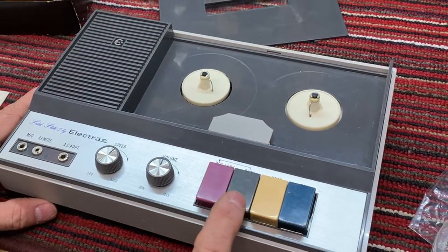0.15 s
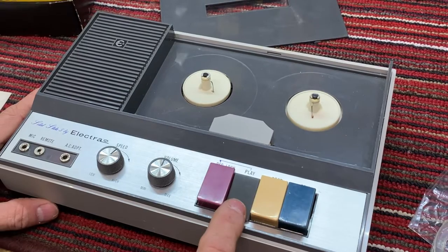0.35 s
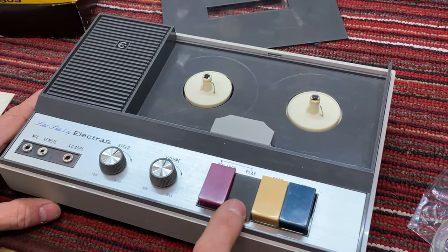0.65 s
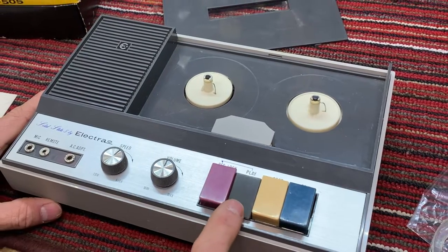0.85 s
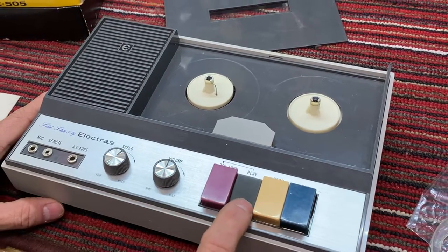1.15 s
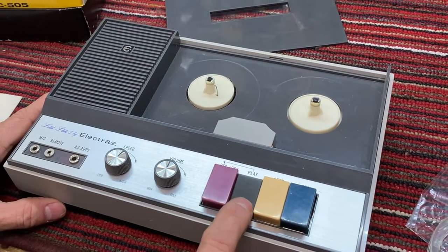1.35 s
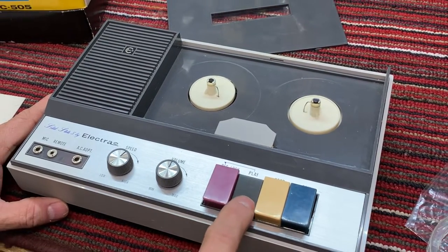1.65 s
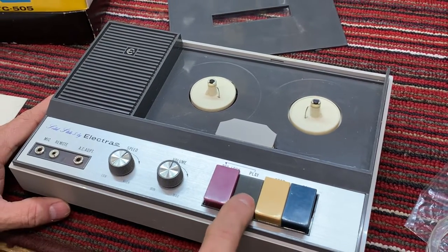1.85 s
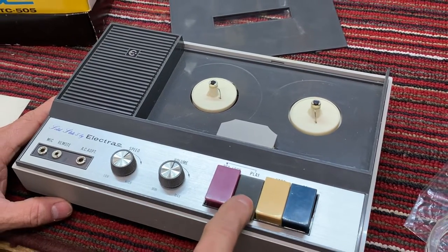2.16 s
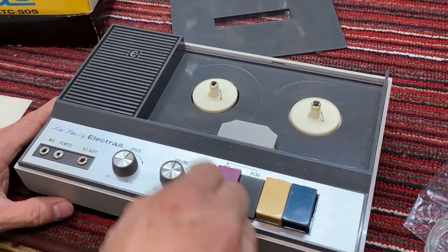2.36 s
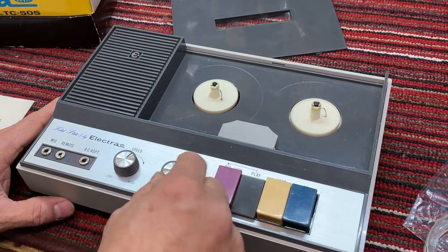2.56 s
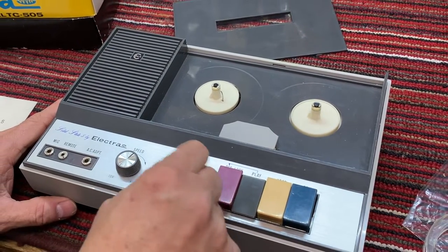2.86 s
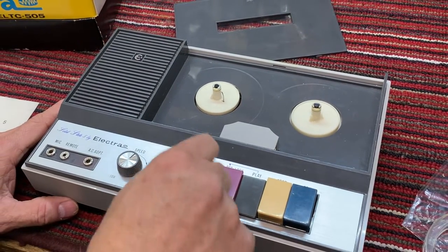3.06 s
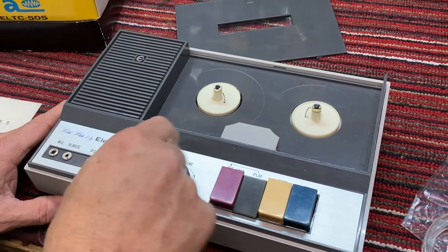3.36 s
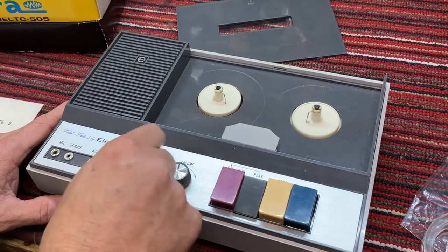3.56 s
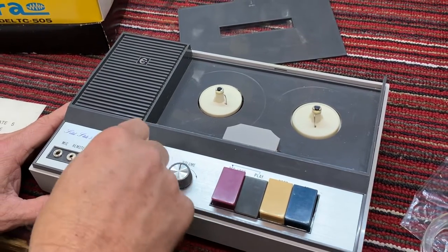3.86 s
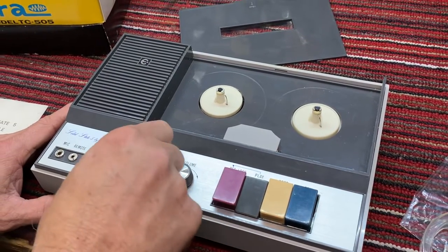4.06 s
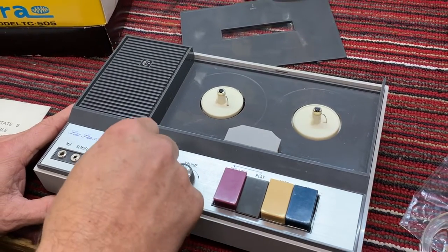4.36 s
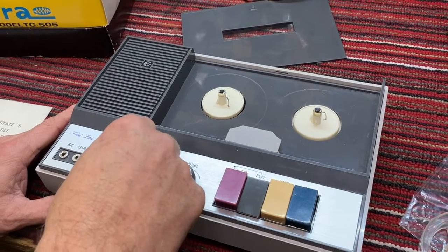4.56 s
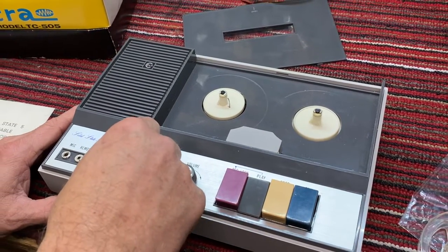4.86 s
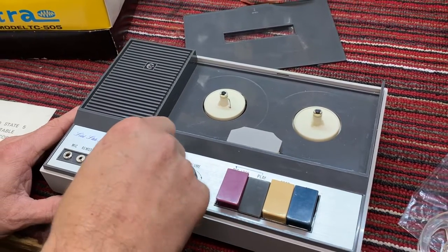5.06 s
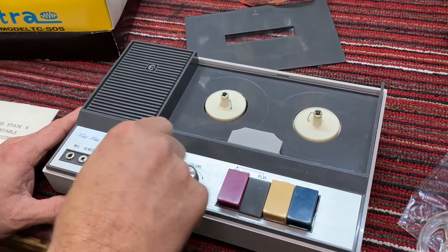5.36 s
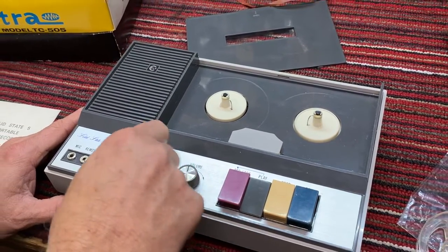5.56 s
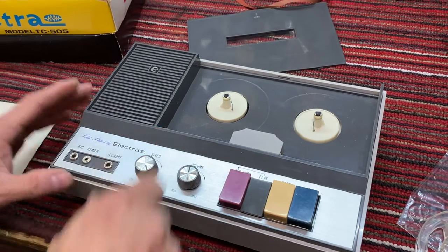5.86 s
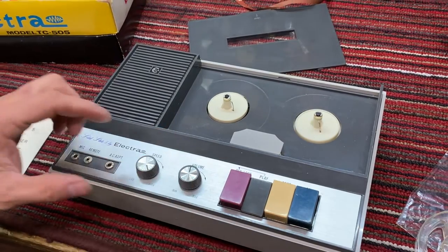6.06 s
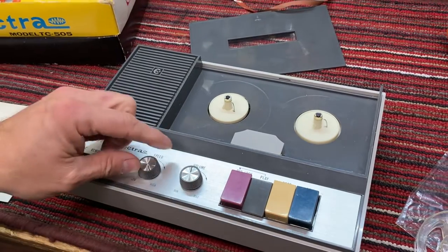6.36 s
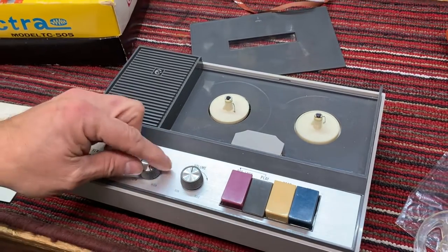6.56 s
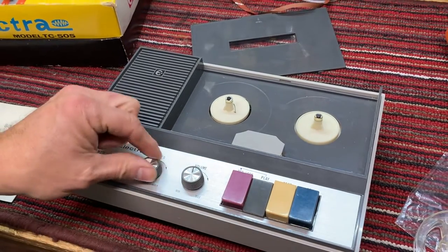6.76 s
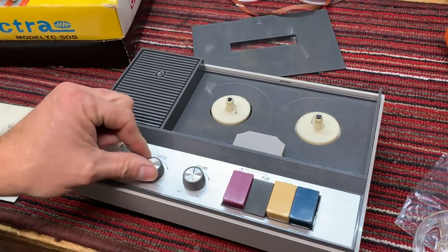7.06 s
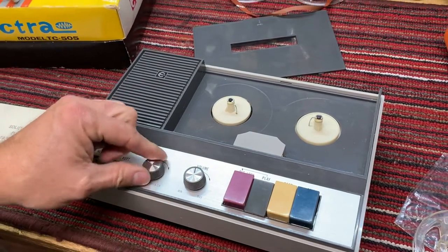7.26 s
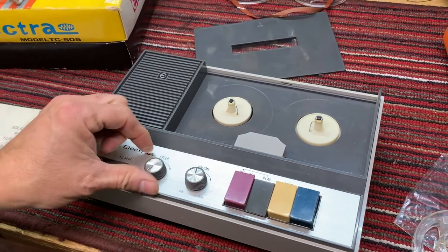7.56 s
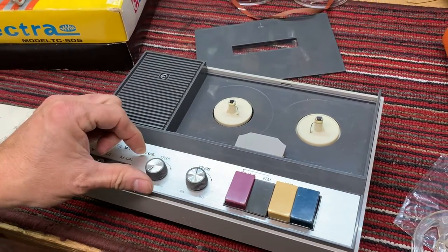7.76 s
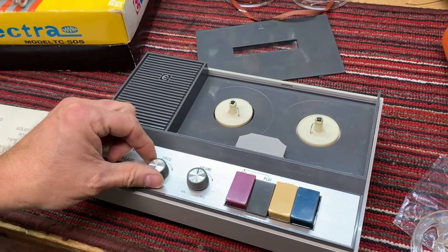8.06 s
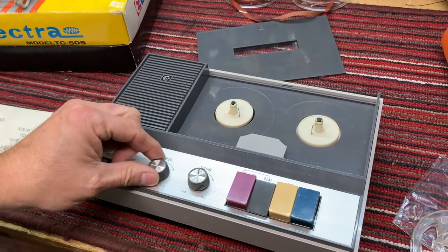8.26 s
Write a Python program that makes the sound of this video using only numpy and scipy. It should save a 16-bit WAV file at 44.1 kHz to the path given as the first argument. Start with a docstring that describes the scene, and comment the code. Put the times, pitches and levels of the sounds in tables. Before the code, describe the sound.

A plastic key clacks down hard, then creaks and rattles over a fast ticking little motor that slows, nearly stops and picks up again.

```python
"""On a rug, a small battery tape recorder: a key clacks down, creaks and rattles while it is held.
Blows and stick-slip friction excite resonances of steel parts, shell and hollow case. Once a turn the
motor shaft ticks and thumps; whirr and hum go with it. It slows as fingers work the knobs, comes nearly
to rest and picks up again. The hand bumps the rug in sinking low tones, over steady room noise."""
import sys
import numpy as np
from scipy import signal
from scipy.fft import rfft, irfft
from scipy.io import wavfile
from scipy.ndimage import uniform_filter1d

SR = 44100
rng = np.random.default_rng(int(sys.argv[2]) if len(sys.argv) > 2 else 0)


def unload_wav(signal):
    """Save mono or channel-first audio to the path in sys.argv[1] as 16-bit WAV at rate SR, clipped to [-1, 1]."""
    wavfile.write(
        sys.argv[1],
        SR,
        np.round(np.clip(np.atleast_2d(signal).T, -1, 1) * 32767).astype(np.int16),
    )


def invert_db(x):
    """Field ratio 10**(x/20) for x, a level in decibels (scalar or array-like)."""
    u = np.asarray(x, float) / 20
    return 10 ** u


N = 370881
TIME, HZ = np.arange(N) / SR, np.fft.rfftfreq(N, 1 / SR)

# All levels are relative; widths are nominal, scaled in body().
# Room noise spectrum. Each row: frequency in Hz, density in dB per Hz.
ROOM_SPECTRUM = [(15, -36), (25, -6), (65, 0), (112, -6), (254, -23), (393, -21), (531, -33), (661, -31),
                 (3310, -44), (4460, -41), (5260, -46), (7920, -42), (8590, -45), (9330, -39), (17000, -48)]
ROOM_DB = -66
# Likeness of the room noise in the two ports. Each row: frequency in Hz, correlation.
ROOM_LIKENESS = [(60, 0.94), (180, 0.59), (550, 0.42), (1650, 0.95), (4970, 0.1), (15000, 0.35)]
# Level difference of the ports. Each row: frequency in Hz, left over right in dB.
PORT_LEVELS = [(60, 0.5), (150, -1.5), (380, 4.5), (950, 2.5), (2380, 0.0), (5980, -5), (15000, 2)]
# Phase difference of the ports. Each row: frequency in Hz, lead of the left in radians.
PORT_PHASES = [(0, .45), (80, .42), (140, .27), (350, .35), (700, .7), (1400, 1.05), (2240, 1.2),
               (2930, 2.6), (3700, 2.8), (5000, 8.0), (5770, 12.0), (6200, 6.1), (6890, 5.5), (7670, 4.2),
               (16700, -7.4)]

# Bumps of the hand on the rug. Each row: start in seconds, level in dB,
# starting pitch in Hz (the glide overshoots it), final pitch in Hz, t60 in seconds.
RUG_BUMPS = [(5.541, -39, 115, 65, 0.35), (7.066, -25.5, 157, 58.2, 0.25), (7.98, -47, 120, 80, .1)]

# Fingers turning or brushing the knobs. Each row: start in seconds, length in seconds,
# then levels in dB of knob ring, panel, scrape and case boom.
KNOB_RUBS = [(3.39, 0.045, -72.5, -50, -77, -47), (3.45, 0.15, -61, -51.5, -72, -47),
             (3.63, 0.088, -55, -46, -63.5, -45.5), (3.695, 0.081, -62, -49, -70.5, -46),
             (3.82, 0.023, -70, -52, -77, -47.5), (4.08, 0.078, -66.5, -63, -78.5, -51.5),
             (4.13, 0.21, -65.5, -56.5, -81.5, -55), (4.35, 0.15, -65.5, -71.5, -84, -59),
             (4.52, 0.27, -75, -73.5, -87, -60), (4.8, 0.084, -70, -57, -86, -53.5),
             (4.93, 0.096, -63, -45.5, -59, -48), (5.05, 0.062, -83, -68, -81, -62),
             (5.25, 0.11, -58, -44.5, -65, -45.5), (5.39, 0.048, -81, -56, -85, -51.5),
             (5.545, 0.052, -58, -37, -67, -36.5), (5.6, 0.075, -57, -60, -72, -49),
             (6.63, 0.12, -62.5, -46.5, -70.5, -49), (6.85, 0.091, -64, -47, -73, -52),
             (6.92, 0.074, -56, -46, -67, -52), (7.03, 0.096, -62, -57.5, -78.5, -52),
             (7.13, 0.073, -62.5, -55, -75.5, -50.5), (7.22, 0.049, -61, -50, -68.5, -48),
             (7.265, 0.06, -62, -51, -65.5, -49), (7.36, 0.089, -77, -62, -84, -56),
             (8.04, 0.06, -77, -84, -99, -58), (8.1, 0.18, -74, -66, -88, -61),
             (8.25, 0.34, -66.5, -77, -82, -58)]
# Fingertips landing on a knob. Each row: the same columns as the rubs.
KNOB_TAPS = [(4.052, 0.033, -82, -49.5, -76, -58), (4.925, 0.021, -51.5, -35.5, -90, -56),
             (5.247, 0.017, -38, -38, -66, -55), (5.481, 0.09, -71.5, -46, -67, -42),
             (5.533, 0.042, -39.5, -30.5, -56.5, -52), (7.954, 0.082, -77, -60, -88.5, -73.5),
             (8.084, 0.054, -74, -62, -87, -70)]
# Friction holding one mode. Each row: start in seconds, length in seconds, mode in Hz, level in dB.
SINGING_MODES = [(2.2, 0.025, 210, -53), (2.94, 0.045, 250, -42), (3.14, .04, 670, -48),
                 (4, 0.049, 530, -50), (3.53, 0.066, 810, -58), (3.664, 0.036, 1360, -39.5),
                 (3.672, 0.089, 2240, -48), (3.716, 0.052, 1337, -52.5), (4.3, .06, 1900, -53),
                 (4.936, 0.047, 710, -49.5), (4.938, 0.065, 1760, -41), (4.96, 0.056, 1160, -44.5),
                 (4.954, 0.057, 2340, -50), (4.95, 0.058, 2980, -47.5), (5.255, 0.072, 520, -41),
                 (6.5, 0.04, 1750, -58), (5.607, 0.039, 1333, -48.5), (5.605, 0.063, 726, -53.5),
                 (5.596, 0.064, 2226, -51.5), (5.616, 0.038, 3040, -53), (6.652, 0.075, 785, -45.5),
                 (6.924, 0.087, 743, -49), (6.916, 0.055, 1400, -50), (7.064, 0.14, 1780, -62),
                 (6.4, 0.04, 1200, -56)]
# Knob resonances. Each row: frequency in Hz, width in Hz, level in dB.
KNOB_PEAKS = [(1920, 260, -6.5), (2230, 390, -1), (2850, 400, -10.5), (3040, 140, -4), (3410, 260, -17)]
# Resonances of the plate under the knobs. Each row: frequency in Hz, width in Hz, level in dB.
PANEL_PEAKS = [(724, 74, 1.5), (1150, 170, -9.5), (1350, 68, -3.5), (1700, 50, -5)]
# Spectrum of skin on metal. Each row: frequency in Hz, density in dB per Hz.
SCRAPE_SPECTRUM = [(1470, -47), (2500, -4), (5530, -19.5), (6600, -17.5), (8530, -21), (10400, -28.5),
                   (12400, -26.5), (13400, -59), (13800, -23), (15200, -33), (17000, -44)]
# Stroke outlines. Each holds: peak as a share of the length (above 1: still swelling when it stops),
# start in dB, end in dB (aimed for beyond the peak), roundness.
RUB_SWELL = 1.15, -5.5, -23, 2.1
RUB_BRIGHT_SWELL = 1.22, -11, -28, 3.5
TAP_SWELL = 0.9, -4.5, -25, 0.04
SING_SWELL = (.4, -12, -20, 1.6)
CREAK_SWELL = 0.58, -2, -22.5, 1
CREAK_BOOM_SWELL = 1.04, -5.5, -14, 2

# Creaks of the key. Each row: start in seconds, length in seconds, shell level in dB, boom level in dB.
KEY_CREAKS = [(0.072, 0.064, -63, -52), (.19, 0.12, -54.5, -37), (.259, 0.083, -36, -30),
              (0.334, 0.057, -55, -43.5), (0.397, 0.069, -35.5, -31.5), (0.457, 0.11, -58, -46.5),
              (0.574, 0.031, -51.5, -33), (0.599, 0.033, -41.5, -35), (0.623, 0.054, -54.5, -44),
              (.925, 0.046, -46.5, -33), (1.039, 0.038, -44.5, -37.5), (1.068, 0.056, -44, -35.5),
              (1.149, 0.025, -41, -40), (1.201, 0.032, -75, -41), (1.229, 0.054, -56, -40.5),
              (1.283, 0.026, -53, -48), (1.369, 0.044, -46.5, -42), (1.452, 0.092, -56, -44),
              (1.571, 0.018, -43.5, -35), (1.613, 0.12, -55.5, -49), (1.774, 0.12, -55, -48.5),
              (1.945, 0.097, -51.5, -39.5), (2.04, 0.039, -69, -53), (2.105, 0.059, -61, -55)]
SLIPS_PER_S, SLIPS_SLOW = 240, 0.33  # mean rate at the start of a creak, share lost by its end
CREAK_STEEL_DB = -26  # share of each slip that reaches the steel parts

# Key and knob clacks. Each row: start in seconds, then levels in dB of crack, shell and boom.
KEY_CLACKS = [(0.1317, -34, -31, -16.5), (0.1442, -5, -24, -18.5), (0.321, -41, -35.5, -27.5),
              (0.572, -60, -37.5, -37), (0.584, -56, -39, -35), (0.604, -47.5, -41.5, -34),
              (0.9097, -26, -43, -41), (0.9198, -27.5, -41, -37), (0.9522, -38, -41, -35),
              (1.045, -47.5, -43.5, -48), (1.0705, -43.5, -48, -46), (1.0992, -35, -38, -51),
              (1.1611, -27.5, -43, -30), (1.1863, -63, -40.5, -38.5), (1.241, -68, -44, -40),
              (1.3082, -48, -38, -28.5), (1.3167, -39, -41, -60), (1.362, -24.5, -33, -29.5),
              (1.444, -46, -35, -34.5), (1.5025, -30, -36.5, -38), (1.5664, -21.5, -46, -50),
              (1.5755, -32, -37, -35), (1.5981, -57, -46.5, -36), (1.611, -51, -42.5, -48),
              (1.685, -63, -47, -38), (1.6904, -32.5, -38.5, -32), (1.7496, -24.5, -46, -44),
              (1.7563, -25, -40, -31.5), (1.853, -58, -45.5, -45), (1.8589, -29, -38, -33),
              (1.926, -27, -45, -52), (1.936, -29, -41, -35.5), (2.025, -27.5, -38.5, -32.5),
              (2.0769, -30, -43, -59), (2.0864, -26.5, -41, -33.5), (2.152, -56, -44, -42),
              (2.1588, -23.5, -36.5, -36), (2.399, -67, -50, -47), (2.8133, -58, -64.5, -58),
              (2.9447, -58.5, -57.5, -43), (3.156, -71, -51.5, -49.5), (3.4057, -69, -59, -56),
              (4.927, -66, -57, -46), (5.25, -69, -57, -48), (5.4835, -52.5, -47.5, -59),
              (5.5349, -39.5, -41, -46), (5.5719, -50, -67.5, -38), (6.567, -66, -55, -49),
              (7.9567, -72, -65, -74), (7.9783, -59, -69, -71), (8.0888, -71, -61.5, -83)]
# Resonances of small steel parts. Each row: frequency in Hz, width in Hz, level in dB.
LATCH_PEAKS = [(3960, 67, -1), (4870, 280, -2), (5430, 37, 2.5), (6000, 80, 1.5), (6170, 75, -6.5),
               (6960, 400, 1.5), (7020, 46, 5.5), (10300, 80, -14.5), (9970, 44, -6.5), (11300, 410, -6.5),
               (11940, 96, -1.5), (15550, 320, -11.5)]
# Resonances of the shell. Each row: frequency in Hz, width in Hz, level in dB.
SHELL_PEAKS = [(718, 36, 1), (1033, 31, -4.5), (1250, 80, -5), (1492, 180, -5.5), (1720, 50, -7),
               (2143, 36, -8), (2270, 25, -1), (2570, 20, -9.5), (2776, 71, -5.5), (3010, 34, -10),
               (3284, 32, -6.5), (3490, 60, -7.5), (3870, 81, -7.5), (4197, 20, -8)]
SHELL_TOP_HZ = 4383
# Resonances of the hollow case. Each row: frequency in Hz, width in Hz, level in dB.
BOOM_PEAKS = [(242, 46, -12), (285, 40, -22), (301, 140, 10.5), (400.6, 68, 3.5), (485.5, 88, 4.5),
              (565, 52, -7)]
# Spectrum of the crack. Each row: frequency in Hz, density in dB per Hz.
CRACK_SPECTRUM = [(1200, -29), (2400, -12), (3200, -6.5), (4070, -4), (5210, -10.5), (6860, -9),
                  (8590, -12.5), (9650, -7), (11200, -11.5), (12400, -8), (13400, -19.5), (15000, -8.5),
                  (15900, -13.5), (17000, -49.5)]
CLACK_DETUNE, CLACK_SPREAD_DB = 0.03, 4  # spread from blow to blow: share of pitch, mode level
BOUNCES_PER_S = 900

# Rotation of the shaft. Each row: time in seconds, shaft turns so far.
SHAFT_TURNS = [(0.16, -8), (0.4, -5), (0.612, -1), (1.011, 8), (1.913, 28), (2.797, 48), (3.465, 63),
               (3.618, 66), (3.905, 71), (4.009, 73), (4.101, 75), (4.392, 80), (4.717, 86), (4.846, 88),
               (5.41, 99), (5.777, 106), (6.0, 111), (6.386, 120), (6.561, 124), (6.864, 130), (7.157, 135),
               (7.435, 139), (7.62, 141), (8.06, 142), (8.25, 144), (8.42, 147)]
# Level of the tick. Each row: time in seconds, level in dB.
TICK_LEVEL = [(0.45, -66), (0.6, -51), (0.66, -39.5), (1.3, -40), (1.65, -43), (1.95, -42), (2.44, -39),
              (3.47, -38.5), (3.52, -54), (3.86, -62), (3.96, -57), (4.05, -42.5), (4.16, -53), (4.35, -60),
              (4.55, -69), (4.7, -59), (4.78, -60), (4.85, -46.5), (4.93, -66), (5.1, -81), (5.21, -48),
              (5.3, -53.5), (5.41, -43), (5.46, -49), (5.55, -48), (5.75, -49.5), (5.87, -43),
              (6.45, -38.5), (6.6, -45), (6.76, -52), (6.81, -70), (6.95, -60.5), (7.22, -54), (7.53, -80),
              (8.41, -73)]
# Modes sounded by the tick. Each row: frequency in Hz, level in dB, t60 in seconds, delay in seconds.
TICK_PARTIALS = [(273, -16, 0.11, 0.0099), (554, -11, 0.056, .004), (741, -10.5, 0.056, .005),
                 (924, 4.5, 0.018, .003), (1110, -8.5, 0.033, .003), (1225, -3, 0.036, 0.0012),
                 (1540, 5.5, 0.028, 0), (1706, -9.5, 0.017, 0.0015), (1840, -18, .012, 0),
                 (2270, -23.5, 0.028, 0.00041)]
# Change of the tick under the hand. Each row: time in seconds, lower modes in dB, top modes in dB,
# timing wobble in turns.
TICK_CHANGE = [(0, -1, 0, .006), (3.5, 0, -1, 0.0057), (3.7, 3.5, -8, 0.039), (5.6, 4, 4, 0.039),
               (6.1, 1, 6, .03), (8.41, 6, 2, 0.041)]
TICK_SPREAD_DB = 3  # spread of each mode's level from tick to tick
# Loose parts shaken by each tick. Each row: frequency in Hz, width in Hz, level in dB.
CHATTER_PEAKS = [(2240, 110, 2), (2780, 830, 12), (3710, 310, 7.5), (3940, 210, -12)]
# Modes of the frame. Each row: frequency in Hz, level in dB, t60 in seconds.
FRAME_PARTIALS = [(115, 1, 0.13), (130.4, 9, 0.062), (157, -16, 0.097), (292, -13, 0.14),
                  (340, -9.5, 0.082), (495, -20, 0.058)]
# Resonances of the support under the motor. Each row: frequency in Hz, width in Hz, level in dB.
RUMBLE_PEAKS = [(43, 6.7, -0.5), (58, 29, -0.5), (80, 11, -1)]
# Spectrum of the whirr. Each row: frequency in Hz, density in dB per Hz.
WHIRR_SPECTRUM = [(88, -22.5), (150, 1), (225, -16), (320, -9.5), (565, -10.5), (636, -23.5), (716, -15.5),
                  (1320, -20.5), (1520, -28), (1970, -30.5), (5610, -44), (6710, -33), (8010, -60.5),
                  (9770, -38), (15100, -41), (17000, -68.5)]
# Harmonics of the commutator hum. Each row: multiple of the shaft speed, level in dB.
HUM_HARMONICS = [(12, 0), (14, -6), (24, -7), (25, -6), (32, -8)]
# Level of the hum. Each row: time in seconds, level in dB.
HUM_LEVEL = [(.3, -78.5), (.5, -57.5), (2.2, -58), (2.85, -66), (3.0, -68.5), (3.45, -65.5), (3.6, -85),
             (5.8, -82), (5.9, -69.5), (6.5, -72), (6.7, -85)]
FREE_TURNS_PER_S, INERTIA_S = 22.5, 0.06
# Level at free speed, its change at standstill, how late the loss sets in.
THUMP_DB, THUMP_SAG_DB, THUMP_BEND = -54.5, -28, 1.9
WHIRR_DB, WHIRR_SAG_DB, WHIRR_BEND = -57, -36.5, 1
# The finger leans on the key from one time to the other, in seconds; this changes both levels.
PRESSED, PRESSED_WHIRR_DB, PRESSED_THUMP_DB = (1.3, 2.12), 5.5, -0.5


def evened(x):
    """Normalisation to unit rms."""
    return x / np.sqrt(np.mean(x ** 2) + 1e-20)


def read(points, hz):
    """Interpolation linear in log frequency."""
    f, value = np.transpose(points)
    return np.interp(np.log(hz + 1), np.log(f + 1), value)


def follow(points):
    """Interpolation linear in time."""
    return np.interp(TIME, *np.transpose(points))


def coloured(x, points):
    """Spectral shaping of white noise at constant power."""
    return irfft(rfft(x) * evened(invert_db(read(points, HZ))), N)


def partials(modes, rise):
    """Modal decay: one damped sine per mode, neighbours in opposite sense, their sum of unit energy."""
    out = []
    for k, (hz, db, t60, *delay) in enumerate(modes):
        t = np.maximum(TIME[:SR // 4] - sum(delay), 0)
        envelope = invert_db(db - 60 * t / t60) * (1 - np.exp(-t / rise)) ** 2
        out.append((-1) ** k * envelope * np.sin(2 * np.pi * hz * t))
    return np.array(out) / np.linalg.norm(np.sum(out, axis=0))


def ring(modes, rise):
    """Superposition of all modes into one impulse response."""
    return partials(modes, rise).sum(axis=0)


def body(peaks, wide, rise):
    """Reciprocity of bandwidth and decay: a wider resonance dies sooner."""
    return ring([(hz, db + 20 * np.log10(w), 1.88 / (wide * w)) for hz, w, db in peaks], rise)


def strike(drive, response):
    """Linear response: the drive convolved with an impulse response."""
    return signal.oaconvolve(drive, response)[:N]


def strokes(rows, shape):
    """Amplitude envelopes, one per level column: a swell to the peak, any fade after it, else silence."""
    peak, start_db, end_db, roundness = shape
    out = np.zeros((len(rows[0]) - 2, N + SR))
    for s, length, *levels_db in rows:
        u = np.arange(0, length, 1 / SR) / length
        before_db = start_db * abs(1 - u / peak) ** roundness
        after_db = end_db * abs((u - peak) / (1 - peak)) ** roundness
        swell = invert_db(np.where(u < peak, before_db, after_db)) * signal.windows.tukey(len(u), 0.05)
        out[:, round(s * SR):][:, :len(u)] += invert_db(levels_db)[:, None] * swell
    return out[:, :N]


def room_tone():
    """Partial coherence: steady noise whose likeness in the two ports varies with frequency."""
    left, other = rfft(rng.standard_normal((2, N)))
    same = np.clip(read(ROOM_LIKENESS, HZ), -1, 1)
    pair = np.array([left, same * left + np.sqrt(1 - same ** 2) * other])
    return invert_db(ROOM_DB) * evened(irfft(pair * invert_db(read(ROOM_SPECTRUM, HZ)), N))


def ports(x, tail_db=-10, t60=0.12, low_hz=700, dull_hz=5000):
    """Two-port reception: direct sound with unlike level and phase, then a short diffuse tail."""
    half = invert_db(read(PORT_LEVELS, HZ) / 2) * np.exp(0.5j * np.interp(HZ, *np.transpose(PORT_PHASES)))
    direct = irfft(rfft(x) * np.array([half, 1 / half]), N)
    t = TIME[:SR // 2]
    tail = rng.standard_normal((2, len(t))) * invert_db(-60 * t / t60) * (t > 0.006)
    band = signal.butter(1, [low_hz, dull_hz], "bandpass", fs=SR, output="sos")
    tail = signal.sosfilt(band, tail)
    tail /= np.linalg.norm(tail[0])
    return direct + invert_db(tail_db) * signal.oaconvolve(x[None], tail, axes=1)[:, :N]


def bumps():
    """Damped oscillation: low swings on the rug that sink in pitch."""
    out = np.zeros(N)
    for s, db, start_hz, end_hz, t60 in RUG_BUMPS:
        t = np.maximum(TIME - s, 0)
        onset = 1 - np.exp(-t / 0.009)
        cycles = end_hz * t + (start_hz - end_hz) * 0.014 * onset
        out += invert_db(db - 60 * t / t60) * onset * np.sin(2 * np.pi * cycles)
    return out


def sings(grains):
    """Selective resonance: friction grains drive single narrow modes."""
    drive, out = np.append(grains, np.zeros(SR)), np.zeros(N + SR)
    for s, length, hz, db in SINGING_MODES:
        at = slice(round(s * SR), round(s * SR) + SR // 4)
        swell = strokes([(0.00099, length, db)], SING_SWELL)[0, :SR // 4]
        mode = ring([(hz, 0, 0.058)], 0.0004)
        out[at] += signal.oaconvolve(swell * drive[at], mode)[:SR // 4]
    return out[:N]


def rubs():
    """Granular friction: clumped grains scrape, ring knob and panel and shake the case."""
    clumps = invert_db(3.3 * evened(uniform_filter1d(rng.standard_normal(N), 400)))
    size = invert_db(3.5 * np.minimum(rng.exponential(1, N), 3))
    grains = size * rng.choice([-1, 1], N) * (rng.random(N) < 800 / SR)  # about 800 a second
    grains = evened(clumps * (evened(grains) + 0.5 * rng.standard_normal(N)))
    taps = strokes(KNOB_TAPS, TAP_SWELL)
    panel, boom = (strokes(KNOB_RUBS, RUB_SWELL) + taps)[[1, 3]]
    # the bright part of a rub starts weaker and soon catches up
    knob, scrape = (strokes(KNOB_RUBS, RUB_BRIGHT_SWELL) + taps)[[0, 2]]
    knob = 0.73 * strike(knob * grains, body(KNOB_PEAKS, 0.93, 0.00048))
    panel = 0.45 * strike(panel * grains, body(PANEL_PEAKS, 1.35, 0.00059))
    scrape = 2.08 * coloured(scrape * grains, SCRAPE_SPECTRUM)
    return knob + panel + sings(grains) + scrape, 0.61 * boom * grains


def creaks():
    """Stick-slip: nearly even slips slow down along each creak, each a click into shell and boom."""
    out = np.zeros((2, N))
    chance = rng.standard_normal((len(KEY_CREAKS), 3, SR // 4))
    for (s, length, shell_db, boom_db), (wander, strength, hiss) in zip(KEY_CREAKS, chance):
        size = len(wander)
        rate = SLIPS_PER_S * (1 - SLIPS_SLOW * np.minimum(TIME[:size] / length, 1))
        rate = rate * (1 + 0.12 * evened(uniform_filter1d(wander, 200)))
        slips = np.diff(np.floor(np.cumsum(rate) / SR + 0.9), prepend=0)
        slips = evened(slips * invert_db(2 * strength)) + 0.18 * hiss
        shell = strokes([(0, length, shell_db)], CREAK_SWELL)[0, :size]
        boom = strokes([(0, length, boom_db)], CREAK_BOOM_SWELL)[0, :size]  # builds up later
        out[:, round(s * SR):][:, :size] += np.array([1.19 * shell, 0.82 * boom]) * slips
    return out


def elsewhere(peaks, chance):
    """Dependence on the striking point: the same resonances slightly moved and unevenly excited."""
    return [(hz * (1 + CLACK_DETUNE * a), w, db + CLACK_SPREAD_DB * b)
            for (hz, w, db), (a, b) in zip(peaks, chance)]


def clacks():
    """Impact: a short soft rise, then a blow with random bounces excites crack, steel, shell and boom."""
    out, lead = np.zeros((3, N + SR)), round(0.008 * SR)
    t = np.maximum(TIME[:4000] - lead / SR, 0)
    chance = rng.standard_normal((len(KEY_CLACKS), 3, len(t)))
    spots = rng.uniform(-np.sqrt(3), np.sqrt(3), (len(KEY_CLACKS), 3, len(SHELL_PEAKS), 2))
    bounce = rng.random((len(KEY_CLACKS), len(t))) < BOUNCES_PER_S / SR
    bounce[:, lead] = True  # the blow itself
    colour = evened(invert_db(read(CRACK_SPECTRUM, np.fft.rfftfreq(256, 1 / SR))))
    colour = np.fft.fftshift(irfft(colour))
    crack = (1 - np.exp(-t / 0.00097)) * (invert_db(-60 * t / 0.015) + 0.094 * invert_db(-60 * t / 0.076))
    shapes = np.array([1.325 * crack, 1.905 * invert_db(-60 * t / 0.035), 2.66 * invert_db(-60 * t / 0.033)])
    shapes[:, :lead] = np.linspace(0, 0.25, lead) ** 2 * np.array([[0.4], [3], [3]])  # the rise
    chance[:, 0] *= abs(chance[:, 0]) / np.sqrt(3)  # the crack is spiky
    chance[:, 1] = 0.35 * chance[:, 1] + bounce * np.sign(chance[:, 1]) * np.sqrt(SR / BOUNCES_PER_S)
    # blunt pushes drive the boom
    chance[:, 2] = np.sign(uniform_filter1d(chance[:, 2], 40, axis=1)) / 6
    for (s, *levels_db), noise, (steel, shell, boom) in zip(KEY_CLACKS, chance, spots):
        bodies = np.array([body(elsewhere(LATCH_PEAKS, steel), 0.82, 0.00005),
                           body(elsewhere(SHELL_PEAKS, shell), 2.7, 0.0001),
                           body(elsewhere(BOOM_PEAKS, boom), 0.55, 0.001)])
        drive = invert_db(levels_db)[:, None] * shapes * noise
        rung = signal.fftconvolve(drive, bodies, axes=1) * np.array([[0.47], [1], [1]])
        start = round(s * SR) - lead
        out[:, start:][:, :rung.shape[1]] += rung
        out[0, start:][:len(t)] += signal.fftconvolve(drive[0], colour, "same")
    return out[:, :N]


def chatter(knock):
    """Secondary impacts: loose parts answer each tick with a rough puff of varying size."""
    puff = strike(knock * invert_db(3.6 * rng.standard_normal(N)), invert_db(-60 * TIME[:3000] / 0.093))
    return 0.0096 * strike(puff * rng.standard_normal(N), body(CHATTER_PEAKS, 0.9, 0.00033))


def strike_unevenly(drives, responses):
    """Modal excitation: every mode takes its own chance level at every blow."""
    chance = invert_db(TICK_SPREAD_DB * rng.standard_normal((len(responses), N)))
    return signal.oaconvolve(drives * chance, responses, axes=1)[:, :N].sum(axis=0)


def ticks(passes):
    """Modal impact: each pass of the shaft knocks, with a rebound 7.5 ms later, and rings the modes."""
    times, *changes = np.transpose(TICK_CHANGE)
    low_db, top_db = (np.interp(TIME, times, change) for change in changes[:2])
    blow, rebound = passes(0), np.roll(passes(0), round(0.0075 * SR))
    knock = blow * invert_db(1.5 * rng.standard_normal(N))
    knock = knock + 0.33 * rebound * invert_db(3 * rng.standard_normal(N))
    # of the upper four modes the lowest keeps its level
    upper_gain = invert_db([0 * top_db] + 3 * [top_db])
    high = strike_unevenly(knock * upper_gain, partials(TICK_PARTIALS[-4:], 0.00061))
    low = strike_unevenly(knock * invert_db(low_db), partials(TICK_PARTIALS[:-4], 0.0006))
    return invert_db(follow(TICK_LEVEL) + 15.5) * (high + low + chatter(knock))


def motor():
    """Rotating machinery: tick and thump once a turn, rumble, brush whirr and hum follow the shaft."""
    turns = follow(SHAFT_TURNS)
    inertia = round(INERTIA_S * SR)
    speed = uniform_filter1d(np.gradient(turns) * SR, inertia)
    drag = np.clip(1 - speed / FREE_TURNS_PER_S, 0, 1)
    pressed = uniform_filter1d(1.0 * (TIME > PRESSED[0]) * (TIME < PRESSED[1]), inertia)
    thump_db = THUMP_DB + THUMP_SAG_DB * drag ** THUMP_BEND + PRESSED_THUMP_DB * pressed
    whirr_db = WHIRR_DB + WHIRR_SAG_DB * drag ** WHIRR_BEND + PRESSED_WHIRR_DB * pressed

    wobble = np.interp(TIME, *np.transpose(TICK_CHANGE)[[0, 3]])
    wander = evened(uniform_filter1d(uniform_filter1d(rng.standard_normal(N), 1500), 1500))
    shaky = np.maximum.accumulate(turns + wobble * wander)  # never turns back

    def passes(angle):
        """Phase crossing: an impulse whenever the shaft passes the angle, in turns."""
        count = np.floor(shaky - angle)
        return np.diff(count, prepend=count[0])

    load = invert_db(thump_db)
    push = 62 * passes(0.3) * invert_db(0.73 * rng.standard_normal(N)) + 0.52 * rng.standard_normal(N)
    thump = strike(load * push, ring(FRAME_PARTIALS, 0.0042))
    rumble = 0.7 * strike(load * rng.standard_normal(N), body(RUMBLE_PEAKS, 1.0, 0.0026))
    throb = 1 + 0.32 * np.cos(2 * np.pi * (turns - 0.3))
    whirr = invert_db(whirr_db) * throb * coloured(rng.standard_normal(N), WHIRR_SPECTRUM)
    hum = evened(sum(invert_db(db) * np.sin(2 * np.pi * k * turns + k) for k, db in HUM_HARMONICS))
    return ticks(passes) + thump + rumble + whirr + invert_db(follow(HUM_LEVEL)) * hum


def scene():
    """Superposition: all sources sound together in the room."""
    crack, shell, boom = clacks()
    creak_shell, creak_boom = creaks()
    knob, knob_boom = rubs()
    case = shell + strike(creak_shell, body(SHELL_PEAKS, 2.3, 0.0001))
    case = signal.sosfilt(signal.butter(8, SHELL_TOP_HZ, fs=SR, output="sos"), case)
    case += invert_db(CREAK_STEEL_DB) * strike(creak_shell, body(LATCH_PEAKS, 0.75, 0.00005))
    hollow = boom + strike(creak_boom + knob_boom, body(BOOM_PEAKS, 0.44, 0.0014))
    # the hollow case gives nothing below about 250 Hz
    case += signal.sosfilt(signal.butter(4, 250, "highpass", fs=SR, output="sos"), hollow)
    return ports(motor() + crack + case + knob + bumps()) + room_tone()


def low_pass(x):
    """Removes everything above the highest recorded frequency."""
    return signal.sosfilt(signal.butter(12, 17150, fs=SR, output="sos"), x)


def record(dry):
    """High-pass response: the microphone loses the deepest bass."""
    cut = signal.butter(2, 35, "highpass", fs=SR, output="sos")
    return low_pass(signal.sosfilt(cut, dry))


dry = scene()
out = record(dry)
unload_wav(out)
```